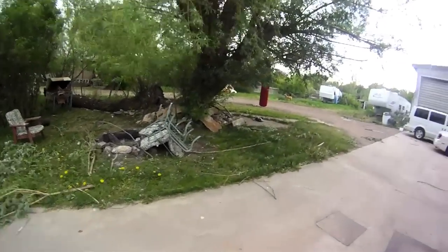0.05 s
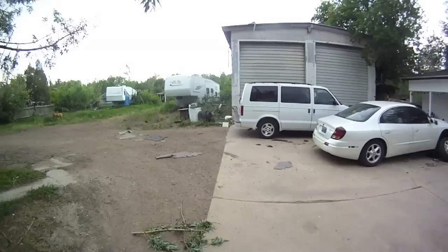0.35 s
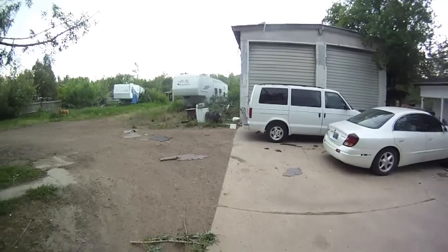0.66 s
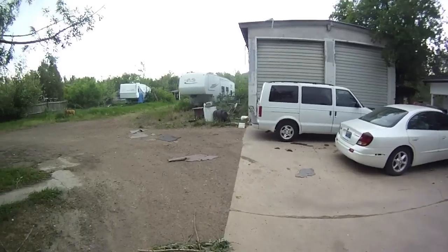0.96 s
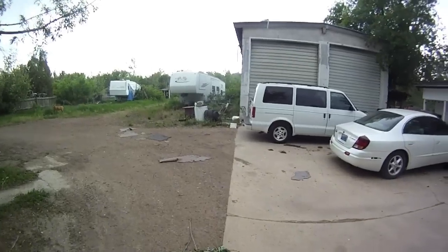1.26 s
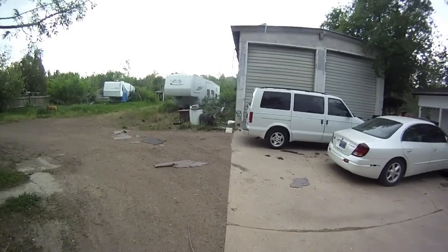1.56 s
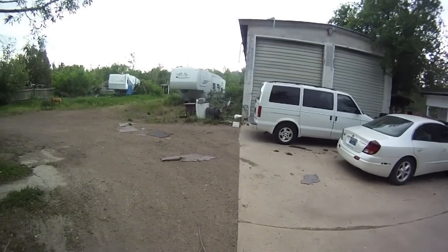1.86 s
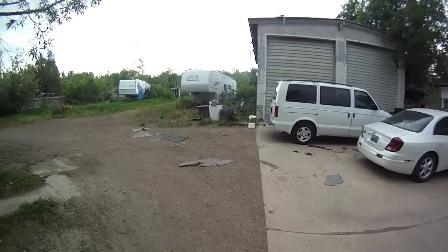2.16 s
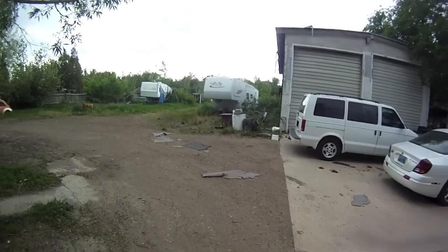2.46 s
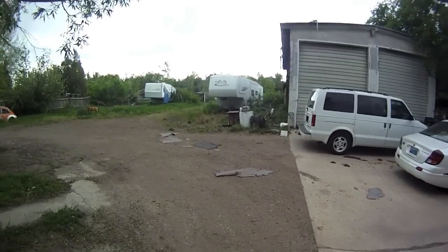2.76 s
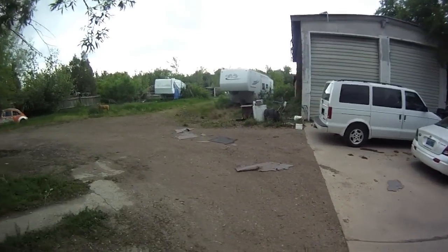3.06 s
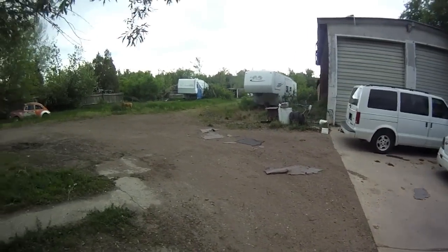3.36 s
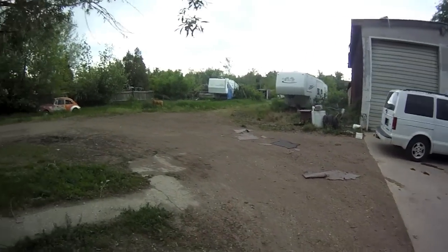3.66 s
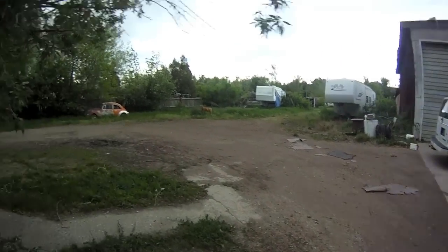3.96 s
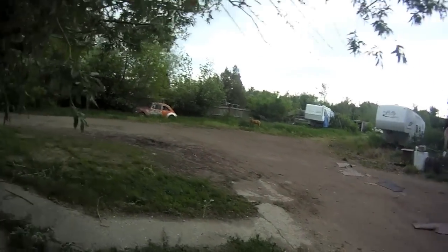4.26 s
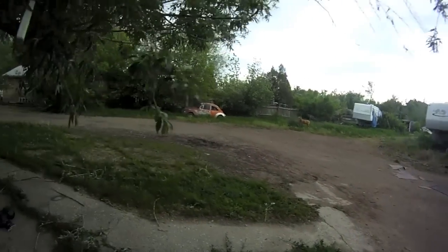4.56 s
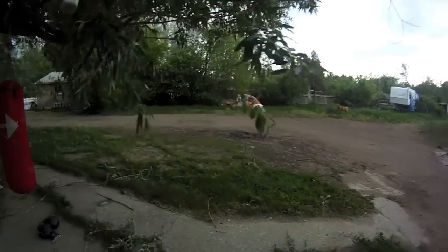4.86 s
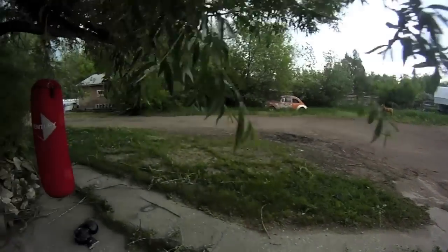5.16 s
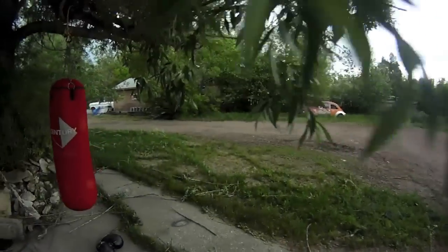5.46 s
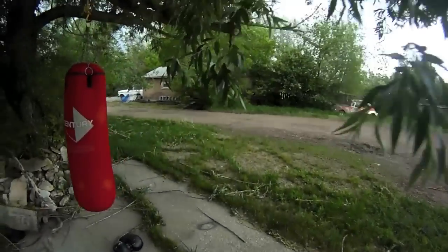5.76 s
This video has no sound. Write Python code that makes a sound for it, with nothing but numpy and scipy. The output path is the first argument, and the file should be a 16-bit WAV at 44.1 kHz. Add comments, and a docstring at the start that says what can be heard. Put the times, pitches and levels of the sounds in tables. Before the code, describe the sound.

Close handling noises come in scattered bursts from a small camera carried through a quiet yard. First there are light scuffs and clicks of fingers on plastic, then a tight creak with sharp snaps, and finally a short run of clicks and knocks. Behind them, air and leaves hush steadily, light wind rumbles on the microphone, and a few thin ticks come through.

```python
"""A quiet yard, heard from a small camera that is carried and turned by hand.
Air and leaves make a soft hush, and a little wind rumbles on the microphone.
Close up, fingers catch and slip on the plastic case, which scuffs, creaks and clicks.
A few thin ticks come through, and the level dips briefly near the start.
Left and right are alike except for a faint hiss."""
import sys
import numpy as np
from scipy import signal
from scipy.fft import rfft, irfft, next_fast_len
from scipy.io import wavfile
from scipy.ndimage import map_coordinates

SR = 44100
rng = np.random.default_rng(int(sys.argv[2]) if len(sys.argv) > 2 else 0)


def dump_mix(stems):
    """Bounce the given channels to the path in sys.argv[1] as a 16-bit WAV at rate SR."""
    frames = np.atleast_2d(stems).T  # one column per channel
    limited = np.clip(frames, -1, 1)  # hard clip at full scale
    pcm = np.round(limited * 32767).astype(np.int16)
    wavfile.write(sys.argv[1], SR, pcm)


N = 264423

# A "colour" says how strong a noise is at each pitch, from low to high.
# colour of the air and leaves: pitch_hz, level_db
HUSH_COLOUR = [(20, 11.5), (60, 6), (150, 3.5), (400, -3), (1700, -11.5), (2250, -10), (2700, -13),
               (5400, -20), (6050, -36), (6600, -22), (10000, -23.5), (12100, -33.5), (14400, -24.5),
               (15800, -35)]
# colour of the wind: pitch_hz, level_db
WIND_COLOUR = [(10, -3), (28, 0), (55, -4.5), (110, -16), (300, -42), (1000, -91)]
# gusts of wind: peak_s, level_db, half_length_s
WIND_GUSTS = [(0.66, -61, 0.2), (1.3, -60.5, 0.5), (2.254, -69, .18), (5.5, -71, 0.27)]
# colour of the faint hiss: pitch_hz, level_db
HISS_COLOUR = [(30, -20.5), (150, -1), (2000, 0.5), (5200, -2), (6000, -18.5), (6700, -4.5), (9000, -9),
               (10500, -28)]
# fingers sliding on the case: peak_s, level_db, length_s, grip (0 loose, 1 tight)
FINGER_SCUFFS = [(0.33, -62.5, .07, .5), (0.838, -46, .055, .65), (0.868, -44, .05, .55),
                 (1.772, -67.5, .35, .6), (2.149, -53, .19, .65), (2.668, -54, .15, .2),
                 (2.752, -60, .18, .2), (2.81, -36.5, .08, 0.05), (2.983, -54.5, .1, .2),
                 (3.876, -44.5, .035, .8), (3.917, -52, .09, .8), (3.99, -52.5, .14, .85),
                 (4.101, -44, .07, .6), (4.154, -47.5, .15, .9), (5.521, -36.5, .025, .8),
                 (5.653, -44, .045, .95), (5.721, -36, .028, .95)]
# a tight finger drags ever harder until the case gives: release_s, level_db
FINGER_DRAGS = [(3.956, -28), (5.57, -37)]
# colour of rubbing: pitch_hz, level_db
RUB_COLOUR = [(30, -9.5), (130, -2.5), (350, -8.5), (600, -13.5), (900, -3.5), (2000, -0.5), (4500, -12),
              (8000, -17.5), (11000, -18), (15100, -20), (16000, -40.5)]
# peaks and dips that colour the rubbing and clicks: pitch_hz, width_hz, loose_grip_db, tight_grip_db
RUB_PEAKS_AND_DIPS = [(830, 100, 11.5, 1.5), (1120, 93, 7, 2), (1870, 260, -2, 0), (2270, 210, 7, 14),
                      (2900, 300, 4.5, 1.5), (3646, 280, 3, 13), (3946, 200, 11.5, -1), (4720, 400, 12, 2),
                      (6000, 780, -15.5, -18.5), (7350, 350, 14, 5), (8380, 450, 10, 10.5),
                      (9800, 600, 7.5, 16), (12100, 970, -16, -19), (14350, 900, 10.5, 15)]
# thin, dry ticks: peak_s, level_db, half_length_s
THIN_TICKS = [(0.407, -54.5, 0.0037), (3.603, -61.5, 0.0019), (4.322, -52, 0.0023)]
# contacts inside the case: start_s, force_db, hardness (0-1), weight (0-1), pitch_hz
CASE_CLICKS = [(0.8316, -43, 0, 1, 2300), (0.8562, -39.5, 0.55, 0.78, 2280), (2.1227, -47.5, 0.4, 0, 2330),
               (2.7972, -32.5, 0.3, 0.55, 2270), (3.7815, -55, .52, .15, 2300),
               (3.8756, -45, 0.77, .7, 1940), (3.8916, -40, 0.64, 0.66, 2100),
               (3.9607, -30, 0.96, 0.45, 2138), (4.0935, -27.5, .62, .83, 1984),
               (4.1280, -44.5, 0.77, .35, 2040), (5.5160, -24, .63, .38, 2360),
               (5.5277, -37, 0.4, 0.56, 2400), (5.5409, -21, 0.06, 0.54, 2230),
               (5.5696, -24.5, 0.63, 0.02, 2386), (5.6350, -50, .45, .1, 2200),
               (5.6662, -39, 0.18, 0.3, 2220), (5.6970, -41, .3, 0.54, 2190), (5.7253, -32, 0.56, 0, 2020)]
# colour of the bright part of each crack: pitch_hz, level_db
CRACK_COLOUR = [(300, -29), (2500, -10), (4200, -5), (5500, -1), (6050, -16), (6600, -3.5), (8200, 0),
                (12100, -20.5), (14500, -6), (16000, -27)]
# tones of a contact's ring: pitch_multiple, level_db, fade_s (time to fall by 60 dB)
RING_TONES = [(1, 0.5, .012), (1.11, -9.5, 0.02), (.8, -14, .012)]
# high tones that brighten that ring: pitch_hz, level_db, fade_s
BRIGHT_TONES = [(9500, -17, 0.016), (9800, -12.5, 0.01), (14120, -17.5, 0.012), (14450, -20.5, .014)]
# tones of the plastic shell: pitch_hz, level_db, fade_s
SHELL_TONES = [(200, -16.5, .02), (833, -8, .026), (1116, -1.5, .03), (1500, -18.5, 0.018),
               (2710, -13.5, 0.025), (3600, -7.5, .022), (4015, -7.5, 0.018), (7920, -15, .018),
               (8290, -15.5, 0.023), (10880, -23.5, .02), (13100, -24, .02)]
# tones of the mount, set off by the hardest snap: pitch_hz, level_db, fade_s
MOUNT_TONES = [(528, -19.5, 0.053), (688, -43, .28), (870, -20.5, 0.025), (1680, -29, .025),
               (1860, -10.5, 0.021), (2620, -54.5, .2), (2823, -56, .25), (11300, -65, .27),
               (12670, -65.5, .25)]
# low tones of a thump on the microphone: pitch_hz, level_db, fade_s
THUMP_TONES = [(48, -6, .068), (115, -4, .046), (198, -9, .018)]
# colour of the low push as the case bends: pitch_hz, level_db
PUSH_COLOUR = [(12, -11), (30, -2), (60, -4), (120, -3.5), (250, -19.5), (800, -70)]
# colour of the ticks: pitch_hz, level_db
TICK_COLOUR = [(300, -23), (3500, -2), (4800, 1), (5600, -9), (6050, -13), (6600, -6), (7300, -4),
               (9000, -12), (15000, -35)]

TIME_S = np.arange(N) / SR


def amp(db):
    """Turn decibels into a number to multiply a sound by."""
    return 10 ** (np.asarray(db) / 20)


def unit(x):
    """Scale a sound so its average strength (rms) is 1."""
    return x / np.sqrt(np.mean(x ** 2) + 1e-20)


def between(ends, share):
    """The value a share (0-1) of the way from one end to the other."""
    return np.interp(share, [0, 1], ends)


def colour_db(colour, hz):
    """Read a colour table's level at any pitch."""
    pitches, levels = np.transpose(colour)
    return np.interp(np.log(hz + 1), np.log(pitches + 1), levels)


def wobble(rate_hz):
    """A smooth curve through rate_hz random points a second."""
    points = rng.standard_normal(int(N * rate_hz / SR) + 4)
    return map_coordinates(points, [TIME_S * rate_hz])


def swells(rows):
    """A loudness curve with one bell-shaped bump for each row."""
    return sum(amp(db) * np.exp(-.5 * ((TIME_S - peak_s) / half_s) ** 2) for peak_s, db, half_s in rows)


def filtered(x, gain_at):
    """Turn each pitch in a sound up or down by gain_at(hz)."""
    size = next_fast_len(N + SR // 2)
    hz = np.fft.rfftfreq(size, 1 / SR)
    return irfft(rfft(x, size) * gain_at(hz), size)[..., :N]


def noise(colour):
    """Noise of strength 1 with the given colour."""
    return unit(filtered(rng.standard_normal(N), lambda hz: amp(colour_db(colour, hz))))


def add(track, start_s, sound):
    """Mix a sound into the track at start_s."""
    part = track[round(start_s * SR):][:len(sound)]
    part += sound[:len(part)]


def ringing(tones, t, attack_s):
    """Pure tones that start quickly and die away."""
    waves = sum(amp(db - 60 * t / fade_s) * np.sin(2 * np.pi * hz * t) for hz, db, fade_s in tones)
    return waves * (1 - np.exp(-(t / attack_s) ** 2))


def hush():
    """Air and leaves make an even hush that barely wavers."""
    return amp(-59.5 + .5 * wobble(7.1) + .21 * wobble(.75)) * noise(HUSH_COLOUR)


def wind(breeze_db=-66.5):
    """A breeze and a few gusts hit the microphone in soft, low lumps."""
    rumble = unit(noise(WIND_COLOUR) * amp(3 * wobble(16)))
    return (amp(breeze_db) + swells(WIND_GUSTS)) * rumble


def hiss():
    """Left and right each have their own faint hiss."""
    return amp(-76.5) * np.array([noise(HISS_COLOUR), noise(HISS_COLOUR)])


def skin():
    """Skin catches and slips in many tiny grains of sound."""
    return unit(rng.standard_normal(N) * amp(2.56 * wobble(700) + wobble(90)))


def colour_touch(force, grip, vary_db, size=2048):
    """Colour a rub or click with peaks and dips; a tight grip makes it creak."""
    hz = np.fft.rfftfreq(size, 1 / SR)
    db = colour_db(RUB_COLOUR, hz)
    for pitch_hz, width_hz, loose_db, tight_db in RUB_PEAKS_AND_DIPS:
        db += between((loose_db, tight_db), grip) / (1 + (2 * (hz - pitch_hz) / width_hz) ** 2)
    # each touch favours slightly different pitches
    db += vary_db * map_coordinates(rng.standard_normal(size), [hz / 170])
    # this fold makes the sound ring only after a touch, never before it
    folded = irfft(np.log(amp(db)))
    folded[1:size // 2] *= 2
    folded[size // 2 + 1:] = 0
    response = irfft(np.exp(rfft(folded)))
    return signal.fftconvolve(force, response / np.linalg.norm(response))[:len(force)]


def scuffs(rise_share=.39, push_range_db=(-6, -13.5)):
    """Each finger stroke swells and dies, bending the case with a low push."""
    out = np.zeros(N)
    grains = skin()
    push = noise(PUSH_COLOUR)

    def stroke(peak_s, db, rise_s, fall_s, grip, push_db):
        near = (TIME_S > peak_s - 2 * rise_s) & (TIME_S < peak_s + 2 * fall_s + .02)
        t = TIME_S[near]
        # climb 20 dB during rise_s, then drop 20 dB during fall_s
        effort = amp(db - 20 * np.maximum((peak_s - t) / rise_s, (t - peak_s) / fall_s))
        rub = colour_touch(grains[near] * effort, grip, vary_db=2.5)
        add(out, t[0], rub + amp(push_db) * push[near] * effort)

    for peak_s, db, length_s, grip in FINGER_SCUFFS:
        rise_s = rise_share * length_s
        stroke(peak_s, db, rise_s, length_s - rise_s, grip, between(push_range_db, grip))
    for release_s, db in FINGER_DRAGS:
        stroke(release_s, db, rise_s=.02, fall_s=.015, grip=1, push_db=-18.5)
    return out


def dip(centre_s=.3736, half_length_s=.05, depth_db=-33):
    """The level fades out and straight back in."""
    away = np.minimum(np.abs(TIME_S - centre_s) / half_length_s, 1)
    return np.maximum(away ** 1.6, amp(depth_db))


def ticks():
    """Tiny bursts of high noise make faint, thin ticks."""
    return swells(THIN_TICKS) * noise(TICK_COLOUR)


def crack(t, bright_noise, attack_s=.00022, fade_s=.016, direct_fade_s=.011):
    """A burst of noise coloured like the rubbing; its sharpest part reaches the microphone directly."""
    burst = rng.standard_normal(len(t)) * amp(-60 * t / fade_s) * (1 - np.exp(-t / attack_s))
    direct = amp(-8.5 - 60 * t / direct_fade_s) * bright_noise[:len(t)]
    return colour_touch(burst, grip=.4, vary_db=3.5) + direct


def shell_knock(t):
    """The plastic shell rings briefly, a little differently at each knock."""
    tones = [(hz * (1 + rng.normal(0, .006)), db + rng.normal(0, 2.2), fade_s)
             for hz, db, fade_s in SHELL_TONES]
    return ringing(tones, t, attack_s=.0005)


def clicks(ring_range_db=(-16, 33.5), thump_range_db=(-28, 12), bounce_s=.0031, snap_s=3.9612):
    """Each contact cracks and knocks the shell; hard ones ring, heavy ones thump the microphone."""
    out = np.zeros(N)
    t = np.arange(SR // 4) / SR
    bright_noise = noise(CRACK_COLOUR)
    hardest = max(row[2] for row in CASE_CLICKS)
    for start_s, force_db, hardness, weight, pitch_hz in CASE_CLICKS:
        tones = [(multiple * pitch_hz, db, fade_s) for multiple, db, fade_s in RING_TONES]
        ring = amp(between(ring_range_db, hardness)) * ringing(tones + BRIGHT_TONES, t, attack_s=.00076)
        knock = amp(-11 + 8 * hardness + 14 * weight) * shell_knock(t)
        thump = amp(between(thump_range_db, weight)) * ringing(THUMP_TONES, t, attack_s=.00056)
        click = crack(t, bright_noise[round(start_s * SR):]) + ring + knock + thump
        add(out, start_s, amp(force_db) * click)
        if hardness == hardest:  # the hardest snap bounces and strikes again
            add(out, start_s + bounce_s, amp(force_db - 8.5) * ring)
    add(out, snap_s, ringing(MOUNT_TONES, t, attack_s=.00078))
    return out


def rustle(start_s=3.9, end_s=5.45, fade_db_per_s=2.5):
    """The hand settles into its grip with faint, uneven rubbing that slowly fades."""
    effort = amp(-67.5 - fade_db_per_s * (TIME_S - start_s) + 4 * wobble(19))
    moving = (TIME_S > start_s) & (TIME_S < end_s)
    return colour_touch(skin() * effort * moving, grip=.82, vary_db=1)


def scene():
    """Hand and yard reach one microphone; only the hiss tells left from right."""
    mono = clicks() + scuffs() + rustle() + ticks() + hush() + wind()
    return (mono + hiss()) * dip()


def record(dry, top_hz=15900):
    """The camera cuts off the very highest pitches."""
    return filtered(dry, lambda hz: 1 / np.sqrt(1 + (hz / top_hz) ** 120))


dry = scene()
out = record(dry)
dump_mix(out)
```